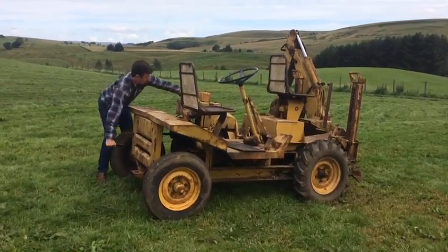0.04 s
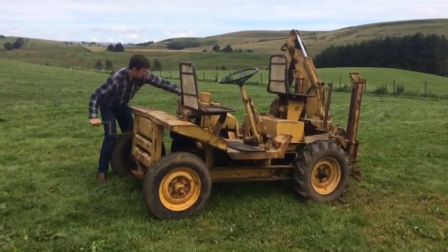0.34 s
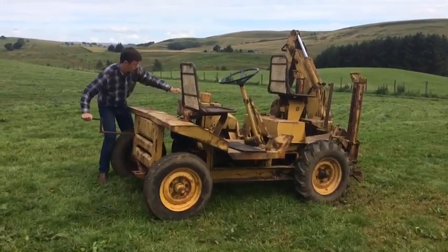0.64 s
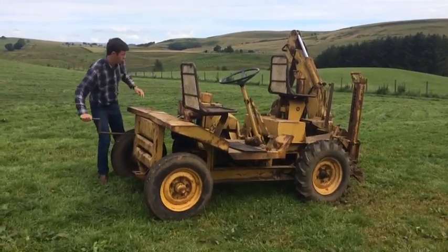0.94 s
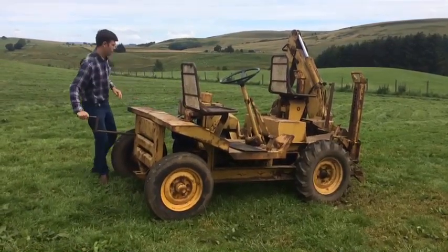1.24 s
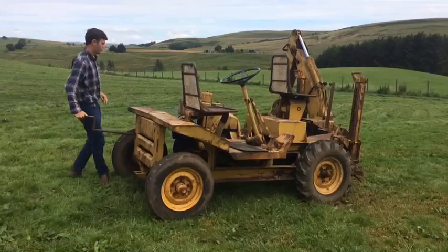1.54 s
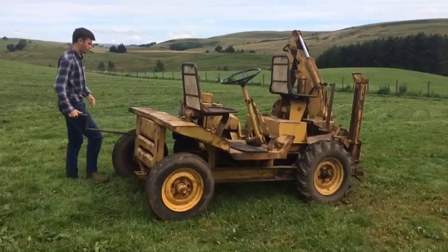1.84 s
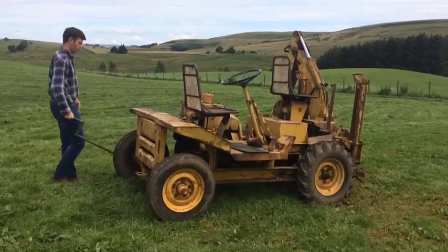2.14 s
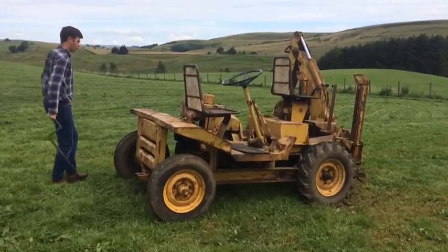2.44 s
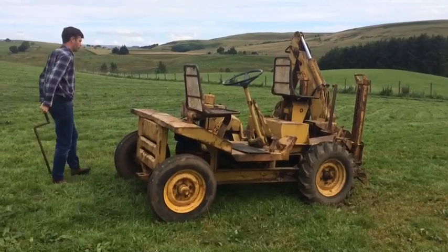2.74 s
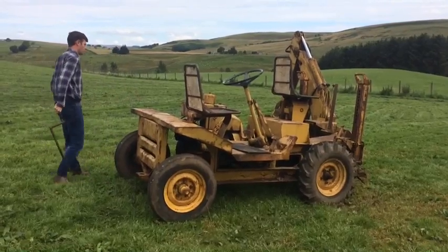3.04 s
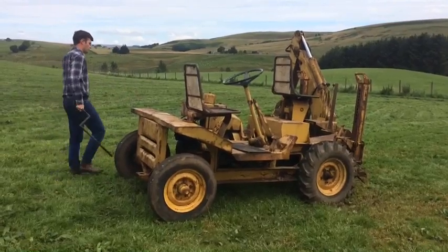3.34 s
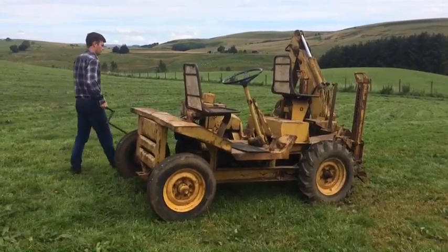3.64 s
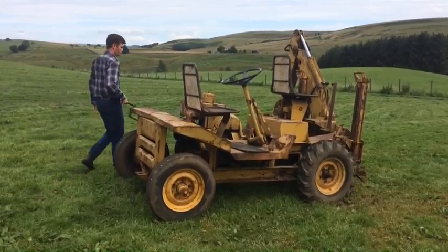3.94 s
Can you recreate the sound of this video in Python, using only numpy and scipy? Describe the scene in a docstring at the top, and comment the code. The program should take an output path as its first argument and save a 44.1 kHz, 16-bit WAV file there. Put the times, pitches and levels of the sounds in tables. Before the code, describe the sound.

An old digger engine starts by hand in an open field. A steel crank handle clanks and scrapes over slow, uneven thumps, then the engine catches and quickens into a steady chug with knocking, hiss and rattling panels.

```python
"""In an open field, an old digger is started by hand: the crank handle clanks and scrapes,
then the engine catches and gathers speed. Each engine cycle has four strokes: an iron knock,
two that fire with a thump and a rasp as gas leaves the exhaust pipe, and a mostly weak one.
Gas hisses past the valves, and loose body panels rattle as the frame shakes."""
import sys
import numpy as np
from scipy import signal
from scipy.fft import rfft, irfft
from scipy.io import wavfile

SR = 44100
rng = np.random.default_rng(int(sys.argv[2]) if len(sys.argv) > 2 else 0)


def to_wav(sig):
    """Store sig (one row per channel, or 1-D mono) as 16-bit WAV at the path in sys.argv[1].

    Samples outside -1..1 are clipped; the rate is SR.
    """
    pcm = np.clip(np.atleast_2d(sig), -1, 1) * 32767
    pcm = np.round(pcm).astype(np.int16)
    wavfile.write(sys.argv[1], SR, pcm.T)  # frames by channels


N = 176400
T = np.arange(N) / SR
STROKES, RUNNING_CYCLE_S = 4, .121  # strokes in a cycle; length of a cycle at running speed
CUTOFF_HZ = 7820

# The engine's cycles. Each row: start in seconds, knock level in dB, rasp levels of strokes 2 and 3
# in dB, thump levels of strokes 2, 3 and 4 in dB.
ENGINE_CYCLES = [ (-.165, -29.5, -11, -20.5, -21, -25, -34), (0.145, -35, -30.5, -23.5, -28.5, -27.5, -60),
                 (0.473, -32.5, -24, -20, -21, -18, -60), (0.713, -31, -22.5, -27, -22, -18.5, -37),
                 (0.93, -25.5, -23.5, -27.5, -14.5, -23, -60), (1.123, -24, -21.5, -37.5, -17.5, -18, -27),
                 (1.302, -24.5, -26, -29.5, -15, -14.5, -35), (1.468, -26, -25, -32.5, -18, -26, -37),
                 (1.626, -26.5, -28.5, -26.5, -16.5, -17, -40), (1.778, -26, -26.5, -34, -21, -17, -26.5),
                 (1.922, -23, -39, -45.5, -18, -21, -40), (2.071, -29.5, -27.5, -36, -17.5, -18.5, -24),
                 (2.212, -30.5, -28, -29, -26, -20, -43), (2.351, -27.5, -27.5, -30, -26, -17.5, -33),
                 (2.491, -27, -25, -27, -23, -18, -20), (2.625, -26.5, -27.5, -23.5, -36, -29.5, -49),
                 (2.757, -26.5, -24.5, -26, -26, -18, -30), (2.894, -26.5, -29, -23.5, -36, -21.5, -18.5),
                 (3.023, -26, -29.5, -22, -50, -15, -25.5), (3.155, -27, -29.5, -24, -33, -14.5, -25),
                 (3.278, -23.5, -25, -23.5, -24, -13.5, -54), (3.403, -26, -26, -24.5, -16.5, -17, -33.5),
                 (3.529, -28.5, -24.5, -27, -18, -16.5, -38), (3.651, -26.5, -37, -24, -17.5, -17.5, -34),
                 (3.773, -24.5, -39, -23, -24, -12.5, -43), (3.893, -30.5, -31.5, -29.5, -20, -12, -24)]
# The ringing tones of the block and panels. Each row: pitch in Hz, level in dB, seconds to fade by 60 dB.
BODY_TONES = [(485, -6, .1), (698, -8, .1), (872, -3, .08), (1071, -9, .15), (1263, -3, .15),
              (1342, -2, .1), (2054, -9, .08)]


def engine_strokes():
    """Four evenly spaced strokes a cycle: their times and their knock, rasp and thump levels in dB."""
    # One number per stroke: dB added to the cycle's knock level.
    knock_offsets_db = [-1, -3.5, -10.5, -14.5]
    starts = [row[0] for row in ENGINE_CYCLES]
    lengths = np.append(np.diff(starts), RUNNING_CYCLE_S)
    rows = []
    for (start, knock, rasp2, rasp3, *thumps), length in zip(ENGINE_CYCLES, lengths):
        times = np.linspace(start, start + length, STROKES, endpoint=False)
        rasp_db = (-42, rasp2, rasp3, -44.5)
        thump_db = (-47, *thumps)
        rows += zip(times, knock + np.array(knock_offsets_db), rasp_db, thump_db)
    return np.transpose(rows)


def early_strokes(times):
    """The strokes sound earlier in the cycle as the engine nears running speed."""
    # One number per stroke: how many seconds early it sounds at running speed.
    lead_s = [0.0013, .003, .005, 0.00056]
    speed = RUNNING_CYCLE_S / (STROKES * np.gradient(times))
    return times - np.resize(lead_s, len(times)) * speed ** 4


def exhaust_thumps(times, levels_db):
    """Each puff booms, slides up in pitch as the pipe empties, and leaves the pipe ringing."""
    lead_s, rise_s = .0058, .01
    start_hz, end_hz, glide_s = 73, 170.6, .03964
    pipe_db, pipe_fall_s = -10.5, .077
    out = np.zeros(N)
    for start, db, stroke_s in zip(times - lead_s, levels_db, np.gradient(times)):
        span = slice(max(int(start * SR), 0), int((start + .5) * SR))
        age = np.maximum(T[span] - start, 0)
        hz = end_hz + (start_hz - end_hz) * np.exp(-(age / glide_s) ** 2)
        wave = np.cos(2 * np.pi * np.cumsum(hz) / SR)
        fall_s = .019 * (stroke_s * STROKES / RUNNING_CYCLE_S) ** 1.3  # slow strokes chug longer
        swell = np.sin(np.pi / 2 * np.minimum(age / rise_s, 1)) ** 2
        boom = np.exp(-(np.maximum(age - rise_s, 0) / fall_s) ** 2)
        tail = from_db(pipe_db) * np.exp(-age / pipe_fall_s)
        out[span] += from_db(db) * swell * np.maximum(boom, tail) * wave
    return out


def pipe_mouth(puffs):
    """Swirling gas roughens the puffs, and the open pipe gives out no deep bass."""
    swirl_filter = signal.butter(2, 101, fs=SR, output="sos")
    bass_cut = signal.butter(2, 39.7, "high", fs=SR, output="sos")
    swirl = signal.sosfilt(swirl_filter, rng.standard_normal(N))
    return signal.sosfilt(bass_cut, puffs * (1 + .32 * swirl / swirl.std()))


def exhaust_rasp(times, levels_db):
    """Churning gas rasps out of the pipe with each stroke."""
    # The rasp's tone colour. Each row: frequency in Hz, relative level in dB.
    spectrum = [(100, -19), (200, 7), (280, -12), (450, -2.5), (650, -1), (950, 1), (1500, -7.5),
                (2200, -4.5), (2900, -13.5), (3900, -11.5), (5000, -11.5), (7400, -17.5)]
    return colour(grit() * bursts(times, levels_db, rise_s=.0062, fall_s=.027), spectrum)


def exhaust_bark(times):
    """Each push of gas rings the pipe's higher tones: a throaty bark that grows with speed."""
    # The pipe's tones. Each row: pitch in Hz, level in dB, seconds to fade by 60 dB.
    tones = [(365, -3, 0.066), (487, -5, 0.12), (629.5, -10, 0.087)]
    # One number per stroke: level in dB at running speed. The third is the hardest.
    pattern_db = [-36, -31, -20, -28]
    return strike(times, by_speed(times, pattern_db, db_per_doubling=12), tones, rise_s=.0029)


def burbles():
    """Stray puffs make the pipe hoot briefly as the engine catches."""
    # Each row: start in seconds, pitch in Hz, level in dB.
    hoots = [(1.195, 157.4, -14.5), (1.331, 185, -17), (1.52, 132, -20)]
    ring_s = .13
    return sum(strike([start], [db], [(hz, 0, ring_s)], rise_s=.009) for start, hz, db in hoots)


def knocks(times, levels_db):
    """Worn parts clatter at each stroke and ring the engine block."""
    # The clatter's tone colour. Each row: frequency in Hz, relative level in dB.
    spectrum = [(150, -20.5), (400, -7.5), (800, 5), (1100, -7.5), (1400, 1), (2200, -3.5), (2900, -7.5),
                (3500, -4.5), (4400, -6.5), (5600, -17), (7800, -17.5)]
    force = grit() * bursts(times, levels_db, rise_s=.0036, fall_s=.035)
    return colour(force, spectrum) + from_db(-12.5) * resonate(force, BODY_TONES)


def hollow_knocks():
    """A short hollow blow opens each cycle and stands out while the engine labours at low speed."""
    # The blow's tones. Each row: pitch in Hz, level in dB, seconds to fade by 60 dB.
    tones = [(693, 6, 0.071), (790, 9.5, 0.064), (1288, 2, 0.037), (1740, 2.5, 0.053), (3445, -1, .022)]
    times, knock_db = np.transpose(ENGINE_CYCLES)[:2]
    levels_db = knock_db + by_speed(times, [-6], db_per_doubling=-7.5)
    return resonate(grit() * bursts(times, levels_db, rise_s=.002, fall_s=.026), tones)


def iron_rings(times):
    """The iron block rings on each cycle's first stroke; the casing clonks lower on the second."""
    # The tones of each part. Each row: pitch in Hz, level in dB, seconds to fade by 60 dB.
    block_tones = [(880, 0, 0.049), (1254, -9, .11), (1339, -5.5, 0.18), (1762, -3.5, 0.082)]
    casing_tones = [(654, -7, 0.057), (886, 1.5, 0.25), (1345, -4.5, .1)]
    first, second = times[::STROKES], times[1::STROKES]
    block = strike(first, by_speed(first, [-28.5], db_per_doubling=9.5), block_tones, rise_s=.0018)
    casing = strike(second, by_speed(second, [-26.5], db_per_doubling=15.5), casing_tones, rise_s=.0051)
    return block + casing


def crank_handle():
    """The steel handle's catch clinks, and the handle clanks against the shaft and rings."""
    # The clinks. Each row: start in seconds, level in dB.
    clinks = [(0, -19.5), (0.028, -19), (0.147, -39)]
    # The clanks. Each row: start in seconds, level in dB, fade time in seconds,
    # brightness in dB per octave.
    clanks = [(0.08, -15, 0.026, 3.5), (0.263, -10.5, 0.033, 1.5), (0.408, -24, 0.034, 3),
              (1.904, -24.5, 0.043, -5), (2.011, -22, 0.035, -3)]
    # Their tone colours. Each row: frequency in Hz, relative level in dB.
    clink_spectrum = [(500, -11.5), (1200, -8), (2600, -12), (3700, 2.5), (5400, -10), (6000, 8.5),
                      (6500, -3.5), (7800, -3)]
    clank_spectrum = [(200, -8), (600, -4), (1050, 3), (1400, -2), (1900, 0), (2800, -8), (3500, -4),
                      (4800, -11), (6200, -15), (7800, -31.5)]
    # The handle's tones. Each row: pitch in Hz, level in dB, seconds to fade by 60 dB.
    tones = [(1072, -1, .25), (1136, -3, .25), (1263, 1, .4), (1916, -3, .3), (2439, -1, .24),
             (2530, -4, .2), (3350, -3, .16), (3520, -3, .17), (3850, -4, .18), (4770, -6, .16),
             (5803, -7, .14), (7714, -5, .22)]
    clank_rise_s, ring_db = .002, -12
    noise = grit()
    out = colour(noise * bursts(*np.transpose(clinks), rise_s=.0046, fall_s=.012), clink_spectrum)
    for start, db, fall_s, brightness in clanks:
        out += colour(noise * bursts([start], [db], clank_rise_s, fall_s), clank_spectrum, brightness)
    times, levels_db = np.transpose(clanks)[:2]
    return out + strike(times, levels_db + ring_db, tones, clank_rise_s, detune=0)


def handle_scrape():
    """The handle scrapes on the shaft until the engine catches."""
    # How loud the scraping is. Each row: time in seconds, level in dB.
    loudness = [(0, -33), (.14, -25.5), (.2, -35.5), (.34, -25.5), (.45, -27), (.51, -30), (.57, -24),
                (.62, -23), (.69, -46), (.79, -22), (.88, -57), (1, -62.5)]
    # Its tone colour. Each row: frequency in Hz, relative level in dB.
    spectrum = [(300, -13), (680, 5.5), (900, 3), (1350, 6.5), (2200, 3), (3000, -5.5), (4200, -8),
                (7800, -27.5)]
    return colour(grit() * from_db(np.interp(T, *np.transpose(loudness))), spectrum)


def handle_pull():
    """Steel slides off steel as the handle is pulled away."""
    # The slide's tone colour. Each row: frequency in Hz, relative level in dB.
    spectrum = [(1200, -13), (2500, -1), (3400, 6), (4300, 9), (5400, -10), (7800, -11)]
    return colour(grit() * bursts(times=[1.924], levels_db=[-21], rise_s=.0037, fall_s=.011), spectrum)


def valve_hiss(times):
    """Gas hisses past the valves on every stroke, louder as the engine speeds up."""
    # The hiss's tone colour. Each row: frequency in Hz, relative level in dB.
    spectrum = [(2600, -13.5), (3500, 5.5), (4400, 8), (5600, -2.5), (7000, 4.5), (7800, -4.5)]
    # One number per stroke: dB added to the hiss level.
    pattern_db = [-4, -2.5, 2, 6]
    levels_db = -35.5 + by_speed(times, pattern_db, db_per_doubling=19.5)
    return colour(grit() * bursts(times, levels_db, rise_s=.006, fall_s=.018), spectrum)


def panel_rattle():
    """Loose panels tap at random as the frame shakes."""
    # How loud the rattle is. Each row: time in seconds, level in dB.
    loudness = [(0, -35), (.2, -32.5), (.35, -38), (.6, -26), (.75, -30.5), (.9, -35.5), (1.2, -31),
                (1.6, -36), (1.9, -30), (2.2, -30.5), (3.2, -30.5), (4, -30.5)]
    # Its tone colour. Each row: frequency in Hz, relative level in dB.
    spectrum = [(25, -19.5), (70, -1.5), (160, 12.5), (270, -1), (450, 0), (950, 0), (1500, -7),
                (2200, -10.5), (2900, -22.5), (4000, -13), (5800, -19), (7800, -35.5)]
    taps_per_s, power_fall_s = 130, .014
    taps = (rng.random(N) < taps_per_s / SR) * from_db(rng.uniform(-8.25, 5, N))
    power = signal.lfilter([1], [1, -np.exp(-1 / (power_fall_s * SR))], taps ** 2 + 1e-18)
    shake = from_db(np.interp(T, *np.transpose(loudness)))
    force = grit() * np.sqrt(power / power.mean()) * shake
    return colour(force, spectrum) + from_db(-8) * resonate(force, BODY_TONES)


def flicker(x):
    """Each half octave wavers in level on its own, so no two strokes sound quite alike."""
    depth_db, step_s, lowest_hz = 3, .018, 250
    hz = np.maximum(np.fft.rfftfreq(N, 1 / SR), 1)
    half_octaves = np.clip(2 * np.log2(hz / lowest_hz), 0, 10)
    spectrum, out = rfft(x), 0
    for band in range(11):
        steps = rng.standard_normal(1000)
        gain = from_db(depth_db * np.interp(T / step_s, np.arange(len(steps)), steps))
        share = np.maximum(1 - abs(half_octaves - band), 0)
        out = out + gain * irfft(spectrum * share, N)
    return out


def short_echoes(x):
    """Many quick echoes between the panels and the ground blur each blow."""
    echo_db, fade_s = -10, .05
    age = T[:SR // 4]
    echoes = rng.standard_normal(len(age)) * from_db(-60 * age / fade_s)
    return x + from_db(echo_db) * signal.fftconvolve(x, echoes / np.linalg.norm(echoes))[:N]


def from_db(db):
    """Turn decibels into a number to multiply by."""
    return 10 ** (np.asarray(db) / 20)


def by_speed(times, pattern_db, db_per_doubling):
    """Levels in dB that repeat each cycle and shift with engine speed."""
    cycle_s = len(pattern_db) * np.gradient(times)
    return np.resize(pattern_db, len(times)) + db_per_doubling * np.log2(RUNNING_CYCLE_S / cycle_s)


def grit():
    """Noise like a dense stream of tiny hits of uneven size, with an average power of 1."""
    sizes_db = .5 * np.clip(rng.standard_normal(len(T[::40])), -2, 2)
    noise = rng.standard_normal(N) * from_db(np.interp(T, T[::40], sizes_db))
    return noise / noise.std()


def bursts(times, levels_db, rise_s, fall_s):
    """The loudness over time of blows that swell and die away; their powers add up."""
    power = np.zeros(N)
    for start, db in zip(times, levels_db):
        span = slice(max(int(start * SR), 0), max(int((start + rise_s + 10 * fall_s) * SR), 0))
        age = T[span] - start
        swell = np.clip(age / rise_s, 0, 1)
        fade = np.exp(-np.maximum(age - rise_s, 0) / fall_s)
        power[span] += (from_db(db) * swell * fade) ** 2
    return np.sqrt(power)


def colour(x, spectrum, db_per_octave=0):
    """Give noise a tone colour while keeping about the same power."""
    size = 4096
    hz, db = np.transpose(spectrum)
    octave = np.log2(np.maximum(np.fft.rfftfreq(size, 1 / SR), 10))
    tilt_db = db_per_octave * np.maximum(octave, np.log2(hz[0]))
    gain = from_db(np.interp(octave, np.log2(hz), db) + tilt_db)
    gain /= np.sqrt(np.mean(gain ** 2 * (octave < np.log2(CUTOFF_HZ))))
    # Fold the filter forward in time so that nothing sounds before its blow.
    folded = irfft(np.log(gain))
    folded[1:size // 2] *= 2
    folded[size // 2 + 1:] = 0
    click_response = irfft(np.exp(rfft(folded)))
    return signal.fftconvolve(x, click_response)[:len(x)]


def resonate(force, tones):
    """A noisy force keeps several tones ringing, each with its share of the power."""
    out = 0
    for hz, db, ring_s in tones:
        decay, angle = from_db(-60 / (ring_s * SR)), 2 * np.pi * hz / SR
        feedback = [1, -2 * decay * np.cos(angle), decay ** 2]
        ringing = signal.lfilter([0, np.sin(angle)], feedback, force + 1e-18)
        out = out + from_db(db) * ringing * 2 * np.sqrt(np.log(1000) / (ring_s * SR))
    return out / np.sqrt(sum(from_db(db) ** 2 for _, db, _ in tones))


def strike(times, levels_db, tones, rise_s, detune=.019):
    """Blows set tones ringing, each time with a random change in strength and, by detune, in pitch."""
    spread_db = 3
    out = np.zeros(N)
    for start, db in zip(times, levels_db):
        span = slice(max(int(start * SR), 0), max(int((start + .5) * SR), 0))
        age = np.maximum(T[span] - start, 0)
        swell = np.minimum(age / rise_s, 1)
        for hz, tone_db, ring_s in tones:
            louder, sharper, phase = rng.standard_normal(3)
            fade = from_db(-60 * np.maximum(age - rise_s, 0) / ring_s)
            wave = np.sin(2 * np.pi * (hz * (1 + detune * sharper) * age + phase))
            out[span] += from_db(db + tone_db + spread_db * louder) * swell * fade * wave
    return out


def scene():
    """Engine, handle and panels together in the open air, in one channel."""
    times, knock_db, rasp_db, thump_db = engine_strokes()
    early = early_strokes(times)
    gas = exhaust_rasp(early, rasp_db) + valve_hiss(early)
    clatter = gas + knocks(early, knock_db) + hollow_knocks() + panel_rattle() + handle_scrape()
    exhaust = pipe_mouth(exhaust_thumps(times, thump_db) + burbles()) + exhaust_bark(early)
    machinery = from_db(-2.5) * (flicker(clatter) + crank_handle() + handle_pull()) + iron_rings(early)
    return (exhaust + short_echoes(machinery))[None]


def record(dry):
    """Round off the loudest peaks and cut away the highest treble."""
    ceiling = .7
    rounded = dry / (1 + (dry / ceiling) ** 4) ** .25
    return signal.sosfilt(signal.ellip(12, .2, 90, CUTOFF_HZ, fs=SR, output="sos"), rounded)


dry = scene()
out = record(dry)
to_wav(out)
```